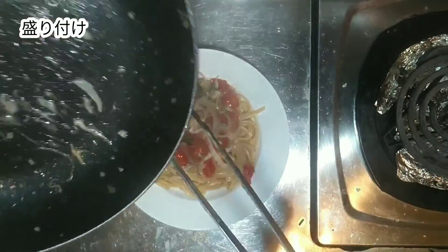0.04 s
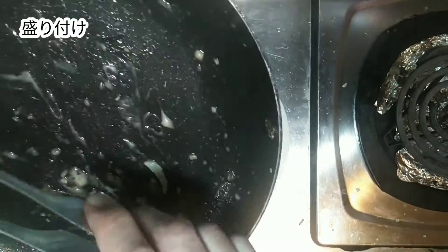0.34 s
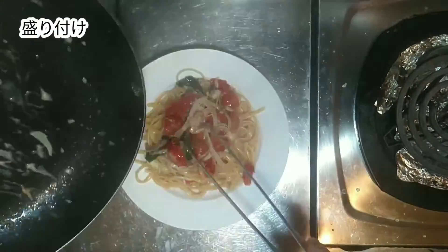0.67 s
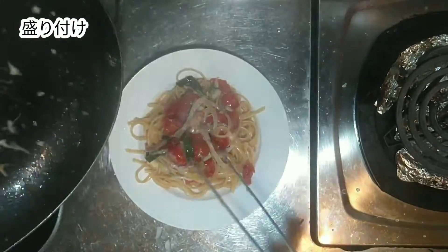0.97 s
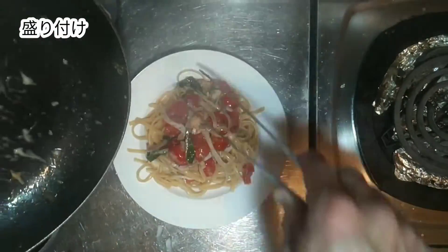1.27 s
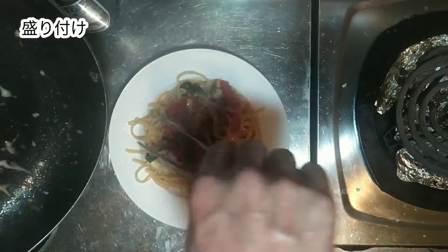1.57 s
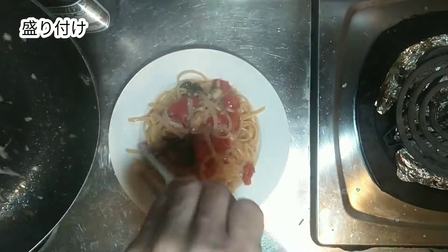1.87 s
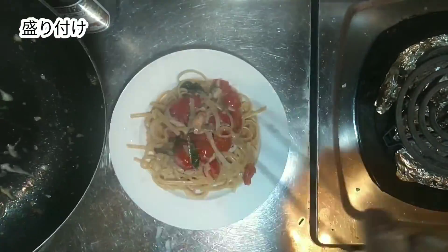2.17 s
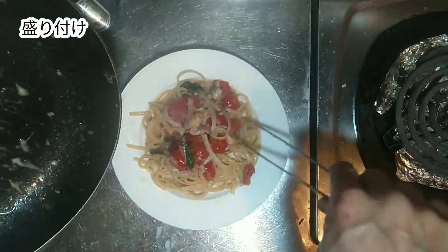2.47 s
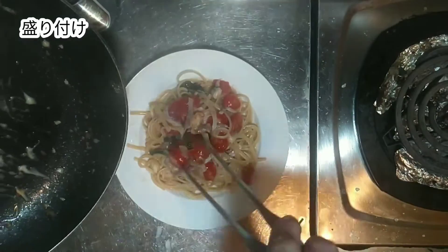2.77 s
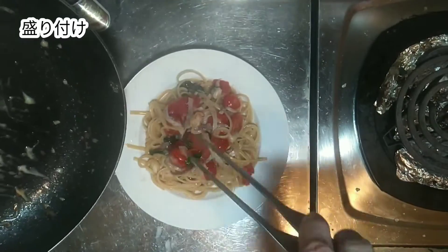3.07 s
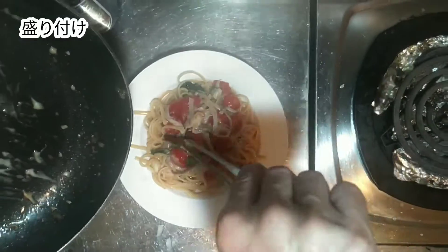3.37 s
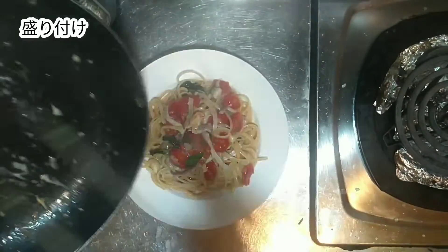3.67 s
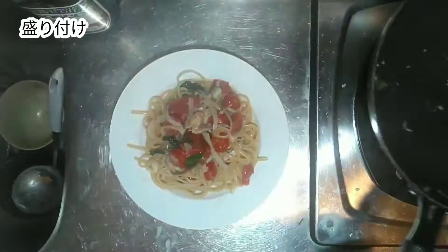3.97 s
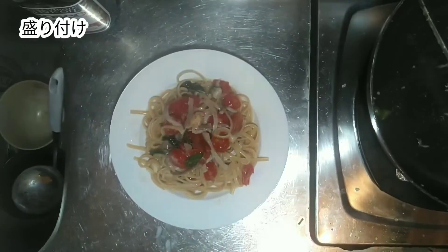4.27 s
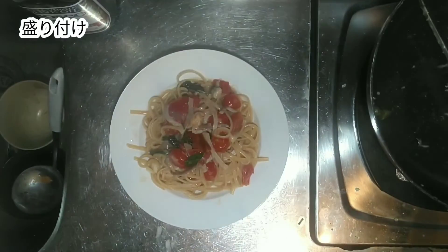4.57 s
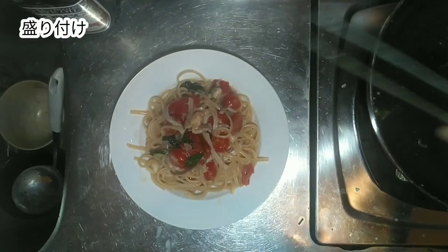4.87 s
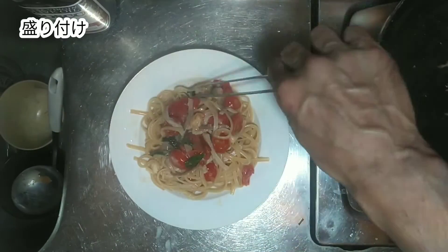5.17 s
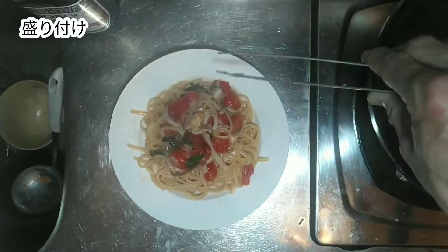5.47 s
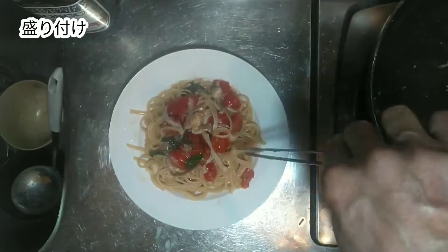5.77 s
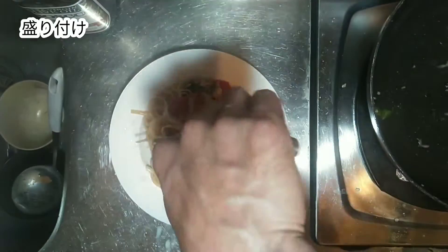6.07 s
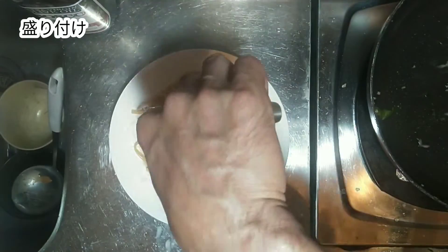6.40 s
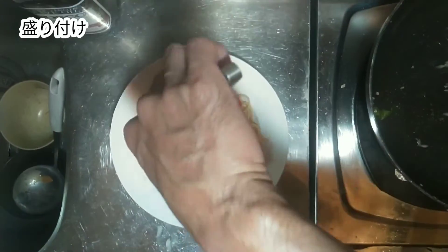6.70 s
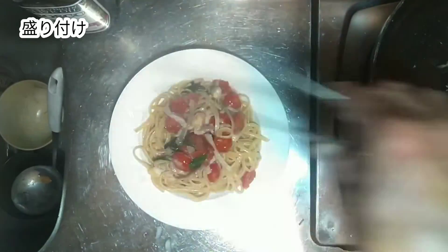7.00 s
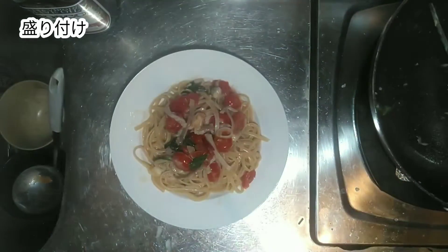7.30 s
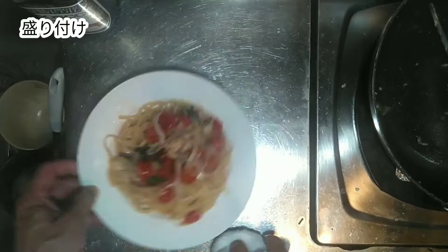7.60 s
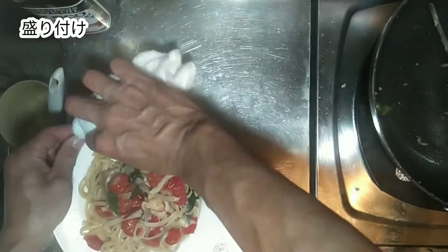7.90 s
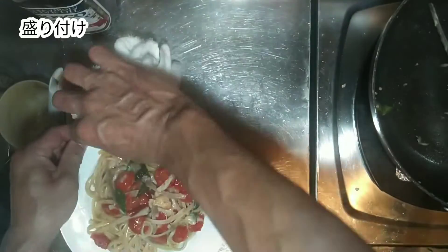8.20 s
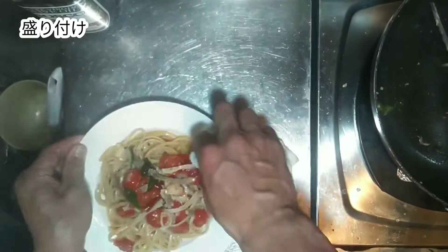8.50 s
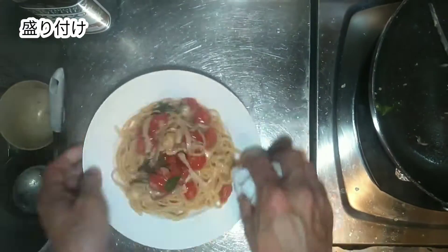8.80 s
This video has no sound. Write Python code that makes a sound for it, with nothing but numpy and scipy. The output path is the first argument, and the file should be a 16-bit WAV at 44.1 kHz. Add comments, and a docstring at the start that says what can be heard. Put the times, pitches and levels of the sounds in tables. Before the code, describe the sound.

An extractor fan hums steadily while steel tongs tick, a pan is knocked and set down, and a cloth briefly wipes the counter.

```python
"""An extractor fan hums in a small kitchen, and almost at once steel clatters: pasta is being served.
Tongs click and scrape, a frying pan is knocked, then set down and slid onto the hob, and the steel
counter thuds. Each impact excites the normal modes of the struck body, while friction adds a rasp.
A brief low groan follows the slide, and near the end a cloth wipes the counter in a hiss of fibres.
The fan runs throughout; all is heard through one close, nearly mono microphone."""
import sys
import numpy as np
from scipy.fft import rfft, irfft, next_fast_len
from scipy.io import wavfile
from scipy.ndimage import map_coordinates

SR = 44100
rng = np.random.default_rng(int(sys.argv[2]) if len(sys.argv) > 2 else 0)


def master_out(mix):
    """Clip the mix to full scale and print it as 16-bit PCM to the path in sys.argv[1]."""
    frames = np.transpose(np.atleast_2d(mix))
    ceiling = np.clip(frames, -1, 1)
    pcm = np.round(ceiling * 32767).astype(np.int16)
    wavfile.write(sys.argv[1], SR, pcm)


N = 390285

# tones of the fan motor: f/Hz, rms level/dB
MOTOR_TONES = [(30, -76), (36.3, -50), (120.2, -49.5), (269, -73.5), (403, -71)]
# duct resonances: f/Hz, nominal width/Hz, rms level/dB
DUCT_MODES = [(23, 12, -55), (48.6, 15, -56.5), (99, 39, -66.5), (134.7, 19.4, -58.5), (260.3, 75, -64),
              (438, 35, -65.5), (831, 41, -71.5), (1032, 79, -71), (1190, 115, -66), (1569, 88, -64.5)]
# hiss of the air: f/Hz, spectral level/dB
AIR_SPECTRUM = [(15, -1.5), (35, 3.5), (90, -15), (300, -9), (600, -10), (1300, -19), (1900, -16.5),
                (3500, -21), (7000, -24.5), (12500, -27), (16000, -33)]
# the tong arms touch: t/s, relative level/dB, contact/s, tilt/(dB/octave), f/Hz favoured by the spot
TONG_CONTACTS = [ (.041, -30, .007, 1, 4700), (0.074, -51, .013, -3, 7000), (2.087, -36.5, .021, .5, 2700),
                 (2.297, -52.5, 0.018, 1, 4330), (3.853, -53.5, .019, 1.5, 7100),
                 (5.007, -41, 0.0079, 1, 1890), (5.125, -43.5, .026, 2.5, 7600),
                 (5.281, -37.5, 0.0071, 1, 6900), (5.3441, -26.5, .012, 3.5, 1876),
                 (5.384, -46.5, .02, 5, 7200), (5.714, -45, .012, 6, 6900), (6.011, -48, 0.022, -1.5, 4400),
                 (6.273, -26.5, 0.012, -2, 3100), (6.458, -56, .014, 0, 4360),
                 (6.684, -44.5, 0.022, -5, 5700), (6.799, -26, 0.02, -1, 2950),
                 (6.961, -32.5, 0.021, 0, 5300), (7.099, -29.5, 0.0089, 2, 5000),
                 (7.169, -41, 0.0032, -6, 5300), (7.23, -53, 0.028, -5, 4465)]
# soft bumps on the counter: t/s, relative level/dB, contact/s, f/Hz favoured by the spot
COUNTER_CONTACTS = [ (0.042, -36, 0.0034, 470), (2.087, -48, 0.023, 775), (3.917, -27, 0.025, 131),
                    (3.95, -34, 0.033, 180), (3.955, -34, 0.049, 42), (4.002, -39.5, 0.011, 300),
                    (4.367, -42.5, 0.017, 161), (6.685, -40, 0.021, 190), (6.8, -40.5, 0.03, 326),
                    (6.963, -37.5, 0.015, 300), (7.125, -40, 0.04, 130), (7.282, -41.5, 0.031, 185),
                    (7.554, -40, 0.011, 120), (7.803, -20.5, 0.011, 92), (7.807, -27, 0.0077, 775),
                    (7.808, -33, 0.017, 300), (8.335, -35, 0.014, 100), (8.381, -45, .012, 730)]
# blows on the pan: columns as for the tongs, then rasp over ring/dB
PAN_CONTACTS = [ (.0425, -20.5, .005, 2.8, 640, 20), (.207, -42, .022, -2, 4060, 6),
                (.373, -53.5, 0.024, -1.5, 690, 0), (.801, -15.5, 0.0042, 1.2, 1730, -11),
                (.8025, -20.5, 0.0096, 0, 1140, -18), (3.905, -40.5, 0.029, 3, 1750, 14),
                (3.921, -24, 0.022, .5, 1740, 5.5), (3.957, -29.5, .034, 0.7, 1330, 7),
                (4.003, -22.5, 0.011, 0.5, 1950, -3), (4.018, -37, 0.023, -1.5, 1320, 18),
                (4.238, -41.5, 0.0057, 0.5, 1750, 20), (4.254, -44, 0.0069, 0.5, 1750, 18),
                (7.102, -24, 0.023, 2.5, 1138, 1), (7.124, -17, .0035, -1.5, 1420, -5),
                (7.133, -40, .017, -1.5, 1130, 10), (7.169, -36.5, .007, 1, 1130, 3),
                (7.18, -38.5, 0.021, -3, 1130, 16), (7.204, -35.5, 0.023, -1, 2250, 5)]
# normal modes of each body: f/Hz, level/dB
TONG_RESONANCES = [(1770, -8.5), (1960, -16.5), (2200, -17), (2700, -13.5), (3650, -2.5), (3960, -27),
                   (4465, 0.5), (5370, -11.5), (5840, -36), (6360, -6), (6510, -6), (7170, -7),
                   (7540, -9.5), (8070, -17), (8510, 1), (8840, -8.5), (10480, 2.5), (12880, -10.5),
                   (13400, -21), (15200, -21)]
COUNTER_RESONANCES = [(42, -7), (85, -4.5), (122, 6.5), (190, -11.5), (300, -6.5), (447, -7), (550, -33),
                      (775, -13.5), (1200, -10.5)]
PAN_RESONANCES = [(640, -7), (825, -15), (1138, 3), (1315, -4.5), (1450, -13), (1670, -2.5), (1760, -1),
                  (1880, -9), (2255, -1), (2510, -7), (2690, -14.5), (3250, -5), (3400, -6), (3890, -9),
                  (4060, -9), (4390, -3), (4790, -2.5), (5060, -6), (8240, -4)]
# friction noise of each surface: f/Hz, spectral level/dB
TONG_FRICTION = [(100, 3.5), (600, 6), (2500, 7), (4500, 5.5), (8500, 9.5), (11000, -3), (16000, -28)]
COUNTER_FRICTION = [(20, 4.5), (60, -15), (160, 1.5), (400, -14), (900, -14), (2000, -20), (8000, -31.5),
                    (16000, -57)]
PAN_FRICTION = [(80, 6), (500, 3), (1400, 2.5), (3000, -1.5), (5000, 2), (8500, 1.5), (11500, -12),
                (16000, -35)]
CLOTH_FRICTION = [(200, 3), (900, 3.5), (3000, 1), (6000, 2), (8500, 5), (11500, -5.5), (16000, -18)]
# strokes of the cloth: t/s, duration/s, level/dB
CLOTH_STROKES = [(7.563, 0.14, -44), (7.681, 0.11, -55.5), (8.529, 0.088, -54.5), (8.608, 0.047, -50.5),
                 (8.655, 0.033, -54), (8.698, 0.14, -52.5), (8.82, 0.04, -53)]
# stereo spread: f/Hz, side over mid/dB
SIDE_RESPONSE = [(2400, -82), (4400, -32.5), (8100, -22.5), (15000, -12)]
# microphone response: f/Hz, gain/dB
MIC_RESPONSE = [(8700, 0), (9600, -7.5), (10600, -9), (11700, 3.5), (13200, 6), (14000, -1), (15200, 11)]


def amp(db):
    """Decibels to amplitude ratio."""
    return 10 ** (np.asarray(db) / 20)


def unit(x):
    """Scale to rms 1."""
    return x / np.sqrt(np.mean(x ** 2) + 1e-20)


def along(points, hz):
    """Gain of (f/Hz, level/dB) points joined on a log axis."""
    f, db = np.transpose(points)
    return amp(np.interp(np.log(hz + 1), np.log(f + 1), db))


def wobble(rate):
    """A smooth random curve, rate knots a second."""
    return map_coordinates(rng.standard_normal(int(N * rate / SR) + 4), [np.arange(N) * rate / SR])


def filtered(x, response):
    """Linear filtering: the spectrum of x times a frequency response."""
    size = x.shape[-1]
    padded = next_fast_len(size + SR // 10)
    return irfft(rfft(x, padded) * response(np.fft.rfftfreq(padded, 1 / SR)), padded)[..., :size]


def noise(response, size=N):
    """Coloured noise of rms 1."""
    return unit(filtered(rng.standard_normal(size), response))


def resonance(f, hz, width):
    """Response of a damped oscillator."""
    return 1j * f * width / (hz * hz - f * f + 1j * f * width)


def add(track, s, sound):
    """Superpose a sound on the track at time s."""
    part = track[max(round(s * SR), 0):][:len(sound)]
    part += sound[:len(part)]


def stroke(seconds, skew):
    """A half-sine swell and release; skew over 1 delays the peak."""
    return np.sin(np.pi * np.linspace(0, 1, round(seconds * SR)) ** skew)


def fan():
    """Rotation gives a slightly unsteady hum; airflow hisses and drives the duct's resonances."""
    t = np.arange(N) / SR
    hum = np.zeros(N)
    for hz, db in MOTOR_TONES:
        peak = np.sqrt(2) * amp(db + 0.25 * wobble(12))
        hum += peak * np.sin(2 * np.pi * hz * t + 0.38 * wobble(2.4))
    duct = sum(amp(db) * noise(lambda f: resonance(f, hz, 1.47 * width) ** 2)
               for hz, width, db in DUCT_MODES)
    hiss = amp(-58) * noise(lambda f: along(AIR_SPECTRUM, f))
    return hum + duct + hiss


def contacts(rows, modes, friction, width_hz, direct_db, ring_t60, rasp_t60,
             sag_db, scatter_db, rise_share, spot_db):
    """Modal ringing plus friction noise: each contact swells, then dies away quickly."""
    track, t = np.zeros(N), np.arange(SR // 5) / SR
    hz, mode_db = np.transpose(modes)
    detune = 0.0062  # from contact to contact each mode shifts by a small share of its pitch
    mode_t60 = ring_t60 * (hz[:, None] / np.median(hz)) ** -0.25  # high modes die first
    # chatter is heard partly direct, partly through the modes, most through the strong ones
    share = unit(amp(mode_db / 2))[:, None]
    modal = lambda f: np.linalg.norm(share * resonance(f, hz[:, None], width_hz), axis=0)
    body = lambda f: along(friction, f) * np.hypot(amp(direct_db), modal(f))
    for s, db, contact_s, tilt_db, spot_hz, rasp_db in rows:
        hardness = lambda f: amp(tilt_db * np.log2(f + 20))
        near = np.exp(-(np.log2(hz / spot_hz) / 0.11) ** 2)
        struck_db = mode_db + near * (spot_db - mode_db)  # modes near spot_hz tend to spot_db
        strength = hardness(hz) * amp(struck_db + scatter_db * rng.standard_normal(len(hz)))
        pitches = hz * (1 + detune * rng.standard_normal(len(hz)))
        partials = np.sqrt(2) * np.sin(2 * np.pi * (pitches[:, None] * t + rng.random((len(hz), 1))))
        chatter = noise(lambda f: body(f) * hardness(f), size=len(t))
        progress = t / contact_s
        pressure = np.minimum(progress / rise_share, 1) * amp(sag_db * np.minimum(progress, 1))
        after_s = np.maximum(t - contact_s, 0)
        fade = lambda t60: amp(-60 * after_s / t60)
        ring = strength @ (partials * fade(mode_t60)) / np.linalg.norm(strength)
        settle_s = rasp_t60 * (contact_s / 0.0077) ** 0.4  # a tap settles sooner than a scrape
        rasp = amp(rasp_db) * chatter * fade(settle_s)
        add(track, s, amp(db) * pressure * (ring + rasp) / np.hypot(1, amp(rasp_db)))
    return track


def tongs():
    """Impact of the thin arms gives short steel clicks; their rasp is nearly all resonance."""
    rasp_db = lambda contact_s: -4.3 + 3 * np.log2(contact_s / 0.013)  # a longer contact rubs more
    clicks = [(s, db, contact_s, tilt_db, hz, rasp_db(contact_s))
              for s, db, contact_s, tilt_db, hz in TONG_CONTACTS]
    return amp(1.5) * contacts(
        clicks, TONG_RESONANCES, TONG_FRICTION, width_hz=43, direct_db=-13, ring_t60=0.039,
        rasp_t60=0.044, sag_db=-3, scatter_db=3.5, rise_share=0.28, spot_db=1)


def counter():
    """Sheet steel thuds in its low modes under pan, hand and plate; stiff spots are higher, brighter."""
    rasp_db, neutral_hz = -3.5, 115
    bumps = [(s, db, contact_s, 0.8 * np.log2(hz / neutral_hz), hz, rasp_db)
             for s, db, contact_s, hz in COUNTER_CONTACTS]
    return amp(-0.5) * contacts(
        bumps, COUNTER_RESONANCES, COUNTER_FRICTION, width_hz=44, direct_db=-4.5, ring_t60=0.055,
        rasp_t60=0.07, sag_db=0.5, scatter_db=1.5, rise_share=0.4, spot_db=5)


def pan_knocks():
    """Blows excite the pan's inharmonic modes, heard as short clanks."""
    return amp(0.5) * contacts(
        PAN_CONTACTS, PAN_RESONANCES, PAN_FRICTION, width_hz=24, direct_db=-6.5, ring_t60=0.025,
        rasp_t60=0.04, sag_db=-1.5, scatter_db=5.5, rise_share=0.29, spot_db=14)


def pan_slide():
    """Stick-slip friction on the hob drives the pan's modes, swelling with speed, fading as it brakes."""
    start_s, peak_s, peak_db = 4.04, 4.195, -34
    swell_db_per_s, brake_db_per_s = 138, 316
    grit = rng.standard_normal(N) * amp(1.2 * wobble(250) + 0.82 * wobble(45))
    modal = lambda f: sum(amp(db) * resonance(f, hz, width=20) for hz, db in PAN_RESONANCES)
    body = lambda f: modal(f) + amp(-15) * along(PAN_FRICTION, f)
    dulling = [(300, 1.5), (1150, 2.5), (3000, -4), (8000, -8.5)]  # f/Hz, gain/dB: duller than a blow
    grate = unit(filtered(grit, lambda f: body(f) * along(dulling, f)))
    t = np.arange(N) / SR
    level_db = peak_db + np.minimum(swell_db_per_s * (t - peak_s), brake_db_per_s * (peak_s - t))
    return (t > start_s) * amp(level_db) * grate


def groan():
    """A brief low groan: a fundamental and its second harmonic glide down in pitch."""
    start_s, level_db, start_hz, sag_hz_per_s = 4.6, -44, 198, 340
    track, swell = np.zeros(N), stroke(seconds=0.078, skew=1.2)
    hz = start_hz - sag_hz_per_s * np.arange(len(swell)) / SR
    phase = 2 * np.pi * np.cumsum(hz) / SR
    tone = unit(np.sin(phase) + amp(-12) * np.sin(2 * phase))
    add(track, start_s, amp(level_db) * swell * tone)
    return track


def cloth():
    """Friction of fibres on steel gives broadband noise that follows the pressure of uneven strokes."""
    pressure = np.zeros(N)
    for s, seconds, db in CLOTH_STROKES:
        add(pressure, s, amp(db) * stroke(seconds, skew=1.04))
    brushing = noise(lambda f: along(CLOTH_FRICTION, f)) * amp(2.4 * wobble(120))
    return pressure * unit(brushing)


def scene():
    """The sounds superpose nearly in mono, with a faint stereo width added in the treble."""
    mid = tongs() + pan_knocks() + pan_slide() + counter() + groan() + cloth() + fan()
    side = filtered(mid, lambda f: 1j * along(SIDE_RESPONSE, f))
    return np.array([mid + side, mid - side])


def record(dry):
    """The small microphone acts as a band-limited filter with dips and peaks in its treble."""
    top_hz = 16050
    return filtered(dry, lambda f: along(MIC_RESPONSE, f) * (f < top_hz))


dry = scene()
out = record(dry)
master_out(out)
```